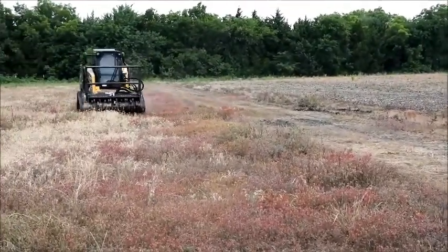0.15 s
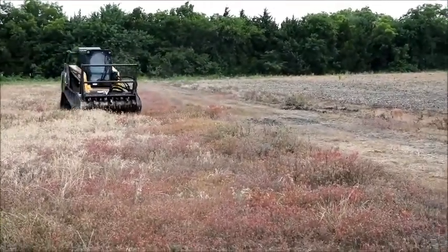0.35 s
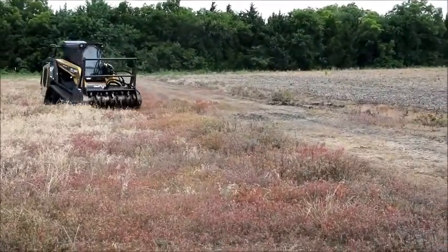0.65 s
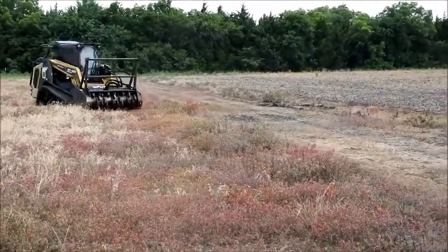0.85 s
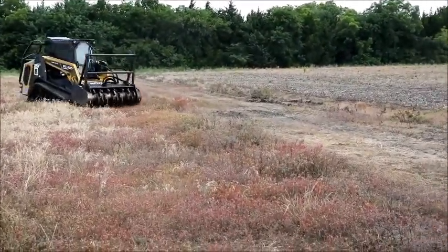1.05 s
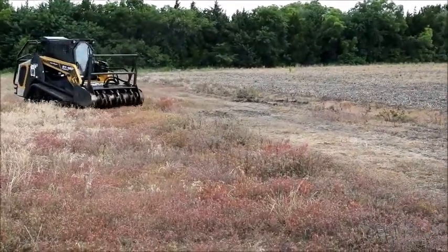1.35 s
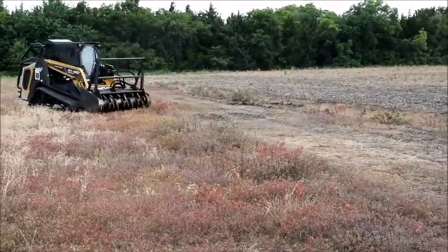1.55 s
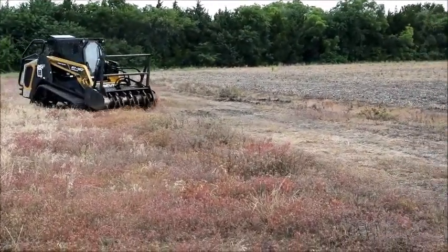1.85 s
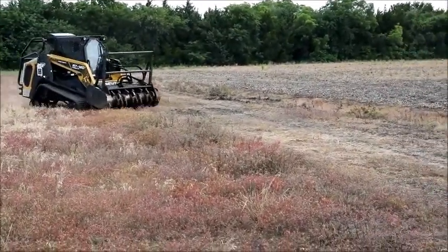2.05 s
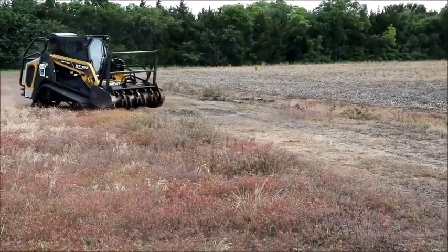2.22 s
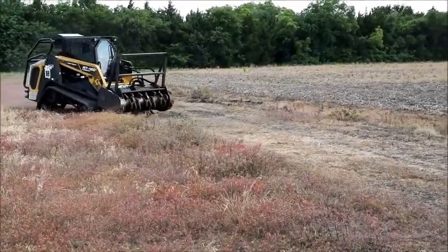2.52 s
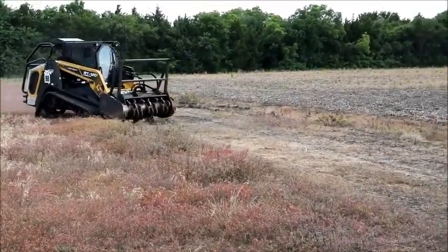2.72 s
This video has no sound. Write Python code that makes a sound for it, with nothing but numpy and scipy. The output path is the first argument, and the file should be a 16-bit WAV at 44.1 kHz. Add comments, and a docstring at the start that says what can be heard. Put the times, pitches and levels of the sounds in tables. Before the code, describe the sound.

A tracked mulcher drives over an open dry field, its steel tracks clanking and scraping in a fast, even rhythm. The clatter grows louder and slightly quicker as it nears, over a steady diesel drone and thin high squeals.

```python
"""A tracked mulcher on a dry field

The machine turns, comes nearer and gathers speed. Each steel track link clanks on the toothed drive
wheel, scrapes into its seat and thumps the frame; once under way, the far track clacks too.
The diesel engine and its hydraulic pump drone beneath, and the dry running gear squeals thinly."""
import sys
import numpy as np
from scipy import signal
from scipy.fft import rfft, irfft, next_fast_len
from scipy.io import wavfile
from scipy.ndimage import uniform_filter1d, map_coordinates

SR = 44100
rng = np.random.default_rng(int(sys.argv[2]) if len(sys.argv) > 2 else 0)


def wav_out(sig):
    """Save sig, one row per channel (or a flat mono array), as 16-bit PCM at SR to the path in sys.argv[1]."""
    wavfile.write(sys.argv[1], SR, np.round(np.clip(np.atleast_2d(sig).T, -1, 1) * 32767).astype(np.int16))


N = 127008

# links meeting the drive wheel: t/s, clank level/dB, thump level/dB
LINK_HITS = [(0.0068, -30.5, -20.5), (0.052, -28.5, -15), (0.0935, -27.5, -23), (0.1362, -28.5, -14.5),
             (0.1776, -26.5, -17), (0.2233, -26.5, -25), (0.2664, -27.2, -17), (0.31, -24, -22),
             (0.3508, -22, -20), (0.3956, -23, -19), (0.441, -24, -18), (0.482, -21, -16.5),
             (0.5248, -21.5, -19), (0.569, -20, -38), (0.614, -21, -17.5), (0.656, -23, -47),
             (0.7004, -19, -20), (0.7451, -20.5, -21), (0.787, -20, -18.5), (0.832, -19.5, -39),
             (0.8751, -20.5, -18.5), (0.9182, -22.5, -17.5), (0.962, -20.5, -23.5), (1.004, -21, -35),
             (1.047, -19.5, -20.5), (1.09, -19, -20), (1.1313, -20.5, -42), (1.174, -18, -15),
             (1.2146, -19, -15.5), (1.256, -19, -14), (1.2956, -24.5, -40), (1.3344, -18, -17.5),
             (1.3737, -22, -37), (1.413, -18.5, -53), (1.4486, -24, -16), (1.4889, -22.5, -26),
             (1.5272, -20.5, -16.5), (1.5686, -29, -12), (1.6029, -22.5, -16), (1.644, -22.5, -20),
             (1.6802, -20.5, -18), (1.7145, -20.5, -29), (1.7552, -21, -16.5), (1.7944, -19.5, -35),
             (1.832, -21, -27), (1.869, -21.5, -11.5), (1.9062, -22, -20.5), (1.943, -18.5, -16),
             (1.9792, -22, -17.5), (2.0165, -20.5, -29), (2.0536, -22, -13.5), (2.0897, -22.5, -14.5),
             (2.1269, -18.5, -19.5), (2.1654, -24.5, -14), (2.2, -19.5, -28), (2.2368, -18.5, -32.5),
             (2.2734, -19.5, -15.5), (2.314, -23, -17), (2.347, -18.5, -14.5), (2.3854, -18, -15.5),
             (2.4228, -23, -15), (2.4618, -21.5, -18), (2.4959, -19, -13), (2.5376, -23, -25),
             (2.5748, -18, -16), (2.611, -20.5, -18.5), (2.646, -19, -16), (2.6853, -18, -17),
             (2.7235, -18.5, -17), (2.7644, -23, -17), (2.798, -20.5, -35), (2.836, -19, -15.5),
             (2.8754, -18, -29.0)]
# the scrape grows as the track turns into view: t/s, level relative to the clank/dB
SCRAPE_BALANCE = [(0, -10), (.35, -4.5), (1.25, -1), (1.65, -4), (2.88, -1)]
# tone colours of a clank and of a scrape: f/Hz, relative level/dB
CLANK_SPECTRUM = [(400, -47), (800, -10), (1150, -5.5), (1470, -9), (1700, 0.5), (2100, 1), (2850, 1),
                  (3250, -11), (4500, -61)]
SCRAPE_SPECTRUM = [(2000, -9.5), (3200, -4.5), (3650, 1.5), (4500, -1.5), (5800, -2.5), (6900, 0),
                   (8400, -9.5), (9800, -4), (11200, -13), (12300, -6.5), (13200, -8.5), (15000, -35)]
TURN_S = (1.07, 1.65)  # the machine swings from head-on to side-on


def near_track():
    """Every link clanks, rings briefly and scrapes into its seat; a few catch and snap in."""
    # ringing notes of a steel link: f/Hz, relative level/dB, time to fade by 60 dB/s
    link_modes = [(1323, -14.5, 0.11), (1836, -8, 0.073), (2039, 0, 0.052), (2428, -3.5, 0.052),
                  (2931, -7.5, 0.077)]
    # links that catch: t/s, level/dB
    snap_hits = [(.352, -21), (.700, -19), (.962, -17), (1.005, -21), (1.2565, -17)]
    times, clank_db, _ = np.transpose(LINK_HITS)
    scrape_db = clank_db + np.interp(times, *np.transpose(SCRAPE_BALANCE))
    snaps = strikes(*np.transpose(snap_hits), rise_s=.0003, fade_s=.02) * noise(SCRAPE_SPECTRUM)
    steel = rings(times, clank_db + 1.5, link_modes, rise_s=.0008, detune=.018)
    clanks = strikes(times, clank_db - .6, rise_s=.0008, fade_s=.055)
    clanks *= mottled(noise(CLANK_SPECTRUM))
    scrapes = strikes(times, scrape_db, rise_s=.0012, fade_s=.048, hold_s=.0062)
    scrapes *= mottled(noise(SCRAPE_SPECTRUM))
    return open_treble(steel + clanks) + snaps + scrapes


def frame():
    """Each link thumps the frame and leaves a hollow boom; on a slow track it bounces once."""
    # ringing notes of the frame: f/Hz, head-on gain/dB, side-on gain/dB, time to fade by 60 dB/s
    frame_modes = [(143.6, -10, -23, 0.11), (207, -4, -10, 0.064), (258.6, -8.5, 6, 0.056),
                   (306.5, 2.5, -2.5, 0.062)]
    # boom of the hollow body: f/Hz, relative level/dB
    boom_spectrum = [(90, -87), (150, -24), (220, 17.5), (300, 19.5), (360, -26), (430, -31), (700, -48)]
    lag_s, rise_s, bounce_s = .003, .006, .01336
    times, _, thump_db = np.transpose(LINK_HITS)
    arrivals = times + lag_s + .00015 * rng.standard_normal(len(times))
    out = strikes(times, thump_db - 10.5, rise_s, fade_s=.086) * noise(boom_spectrum)
    slow = times < TURN_S[0]
    for hz, head_on, side_on, fade_s in frame_modes:
        db = thump_db + np.interp(times, TURN_S, [head_on, side_on])
        out += rings(arrivals, db, [(hz, 2, fade_s)], rise_s)
        out += rings(arrivals[slow] + bounce_s, db[slow], [(hz, -5, fade_s)], rise_s)
    return out


def far_track():
    """The hidden track clacks more softly, a little ahead of the near one."""
    # strength of its clacks: t/s, level/dB
    clack_levels = [(1.35, -58), (1.55, -28), (2.4, -28.5), (2.88, -34.5)]
    lead_s, scatter_s = .012, .002
    times = np.transpose(LINK_HITS)[0]
    timing, strength = rng.standard_normal((len(times), 2)).T
    db = np.interp(times, *np.transpose(clack_levels)) + 2 * strength
    clacks = strikes(times - lead_s + scatter_s * timing, db, rise_s=.0086, fade_s=.047)
    return clacks * (noise(CLANK_SPECTRUM) + amp(-1.5) * noise(SCRAPE_SPECTRUM, grit_db=3.5))


def engine():
    """The diesel's firing hum, the pump's whine and weaker tones, over exhaust rumble and fan rush."""
    # engine shaft and pump: t/s, turning rate/Hz, whine level/dB
    shaft_and_pump = [(0, 38.5, -35.5), (.55, 38.55, -43), (1.15, 38.39, -31.5), (1.85, 39.01, -32.5),
                      (2.88, 38.77, -33.5)]
    # hum of the cylinders firing: t/s, level/dB
    firing_levels = [(1.35, -40), (1.9, -37)]
    # weaker tones: pitch as a multiple of the turning rate (the "order")
    orders = [4, 6, 12, 15, 15.5, 18, 22, 27]
    # those tones when the rush is loudest: level/dB
    order_levels = [-46, -36.5, -48.5, -47, -45.5, -46.5, -56, -43]
    # steady noises: t/s, exhaust level/dB, rush level/dB
    noise_levels = [(0, -35, -36), (.5, -33.5, -36.5), (1.15, -29.5, -34.5), (1.4, -33, -34),
                    (1.65, -31, -33.5), (2.3, -34, -32.5), (2.88, -32.5, -33.5)]
    # exhaust rumble: f/Hz, relative level/dB
    exhaust_spectrum = [(45, -38), (60, -16), (115, -16), (140, -9.5), (180, 1.5), (220, -2), (310, 0.5),
                        (355, -10.5), (400, -38), (600, -56), (2000, -35)]
    shaft_hz, pump_db = curves(shaft_and_pump)
    exhaust_db, rush_db = curves(noise_levels)
    shaft_angle = 2 * np.pi * np.cumsum(shaft_hz * (1 + .001 * wobble(10))) / SR

    def tone(order, db, waver_db):
        gain = np.sqrt(2) * amp(db + waver_db * wobble(9.67))
        return gain * np.sin(order * shaft_angle + rng.uniform(0, 2 * np.pi))

    firing = tone(order=2, db=curves(firing_levels)[0], waver_db=-1)
    pump = tone(order=9, db=pump_db, waver_db=.6)
    dip_db = 2.1 * (rush_db - rush_db.max())
    weak_tones = sum(tone(k, db + dip_db, waver_db=-1.5) for k, db in zip(orders, order_levels))
    exhaust = amp(exhaust_db) * noise(exhaust_spectrum)
    return firing + pump + weak_tones + exhaust + amp(rush_db) * rush()


def rush():
    """The fan and running gear rush; the lower part fills out as the machine turns side-on."""
    # tone colour of the rush: f/Hz, relative level/dB
    rush_spectrum = [(100, -21), (400, 2), (520, 2), (800, -1.5), (1080, 5), (1450, -0.5), (2050, 3),
                     (2900, -4), (3300, -6.5), (7000, -14), (8500, -14.5), (12500, -16), (15000, -17),
                     (15600, -40)]
    air = noise(rush_spectrum, grit_db=2.5)
    lows = filtered(air, lambda hz: low_pass(hz, 740))
    lows_db = np.interp(np.arange(N) / SR, TURN_S, [-1.5, 0])
    return open_treble(air) + lows * (amp(lows_db) - 1)


def squeal():
    """A thin, very high squeal, likely dry steel rubbing; in each swell one note sings out."""
    # notes of the rubbing steel: f/Hz, width/Hz, relative level/dB
    modes = [(13500, 105, 0), (13850, 105, -3), (14400, 140, -9), (14640, 190, -8)]
    # the faint, constant squeal: t/s, level/dB
    base_levels = [(0, -43), (2.88, -36.5)]
    # brief swells: middle t/s, level/dB
    swells = [(.22, -34), (.785, -28), (.86, -33), (.92, -33), (1.19, -34), (1.41, -30), (1.605, -30),
              (2.07, -34), (2.21, -29), (2.38, -33), (2.45, -32), (2.61, -30), (2.69, -30), (2.84, -31)]
    swell_half_s = .025
    peaks = lambda f: sum(amp(db) / (1 + ((f - hz) / width) ** 2) ** 2 for hz, width, db in modes)
    rub = unit(filtered(rng.standard_normal(N), peaks))
    out = amp(curves(base_levels)[0] + 2 * wobble(35)) * rub
    t = np.arange(N) / SR
    for middle_s, db in swells:
        swell = amp(db) * np.exp(-((t - middle_s) / swell_half_s) ** 2)
        hz = modes[rng.integers(2)][0]  # one of the two lowest notes
        out += swell * (.5 * rub + np.sin(2 * np.pi * hz * t + wobble(250)))
    return out


def strikes(times, levels_db, rise_s, fade_s, hold_s=0):
    """Loudness curve of a run of blows: each rises, holds, then falls 60 dB in fade_s."""
    t = np.arange(SR // 8) / SR
    shape = (1 - np.exp(-t / rise_s)) * amp(-60 * np.maximum(t - hold_s, 0) / fade_s)
    starts = np.clip(np.round(times * SR).astype(int), 0, N)
    power = np.bincount(starts, amp(levels_db) ** 2, N + 1)
    return np.sqrt(np.abs(signal.fftconvolve(power, (shape / shape.max()) ** 2)[:N]))


def rings(times, levels_db, modes, rise_s, detune=0):
    """Each blow rings the metal's notes (modes) a bit louder or softer; detune scatters their pitch."""
    out, t = np.zeros(N + SR), np.arange(SR // 8) / SR
    chances = rng.standard_normal((len(times), len(modes), 2))
    for start, db, chance in zip(times, levels_db, chances):
        ring = np.zeros(len(t))
        for (hz, mode_db, fade_s), (louder, higher) in zip(modes, chance):
            fade = amp(mode_db + 1.14 * louder - 60 * t / fade_s)
            ring += fade * np.sin(2 * np.pi * hz * (1 + detune * higher) * t)
        at = max(0, round(start * SR))
        out[at:at + len(t)] += amp(db) * ring * (1 - np.exp(-t / rise_s))
    return out[:N]


def mottled(x, patchy_db=2.2):
    """No two links sound alike: adds random patches of tone colour, about one clank long."""
    slices = signal.stft(x, nperseg=256)[2]
    patches = uniform_filter1d(rng.standard_normal(slices.shape), size=2, axis=0)  # blur in pitch
    patches = uniform_filter1d(patches, size=10, axis=1)  # blur in time
    return unit(signal.istft(slices * amp(patchy_db * unit(patches)), nperseg=256)[1][:N])


def open_treble(x):
    """The treble opens up as the track turns into view."""
    treble_db, = curves(SCRAPE_BALANCE)
    treble = filtered(x, lambda hz: 1 - low_pass(hz, 2460))
    return x + treble * (amp(treble_db - treble_db.mean()) - 1)


def noise(spectrum, grit_db=0):
    """Noise with the given tone colour; grit breaks it into tiny impacts."""
    f, db = np.transpose(spectrum)
    grains = rng.standard_normal(N) * amp(grit_db * wobble(2000))
    return unit(filtered(grains, lambda hz: amp(np.interp(np.log(hz + 1), np.log(f), db))))


def filtered(x, response):
    """Scale each frequency in x by response(hz)."""
    size = next_fast_len(N + SR // 2)
    return irfft(rfft(x, size) * response(np.fft.rfftfreq(size, 1 / SR)), size)[:N]


def low_pass(hz, edge_hz):
    """A gain that falls smoothly from 1 to 0 around edge_hz."""
    return 1 / (1 + (hz / edge_hz) ** 4)


def wobble(rate):
    """A smooth curve through `rate` random points a second."""
    points = rng.standard_normal(int(N * rate / SR) + 4)
    return map_coordinates(points, [np.arange(N) * rate / SR])


def curves(rows):
    """One value per sample for each column after the time."""
    times, *columns = np.transpose(rows)
    return [np.interp(np.arange(N) / SR, times, column) for column in columns]


def amp(db):
    """Decibels to gain."""
    return 10 ** (np.asarray(db) / 20)


def unit(x):
    """Scale to an average power of 1."""
    return x / np.sqrt(np.mean(x ** 2) + 1e-20)


def scene():
    """The whole machine in the open field."""
    return (near_track() + far_track() + frame() + engine() + squeal())[None]


def record(dry):
    """Thin the deepest bass and cut off the highest treble."""
    bass_hz, top_hz = 36, 15750
    return filtered(dry[0], lambda hz: (hz < top_hz) * (1 - low_pass(hz, bass_hz)))[None]


dry = scene()
out = record(dry)
wav_out(out)
```